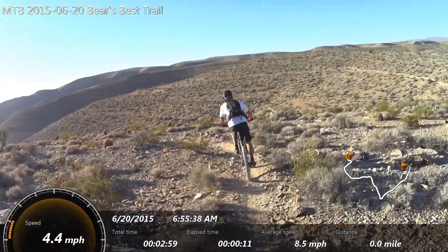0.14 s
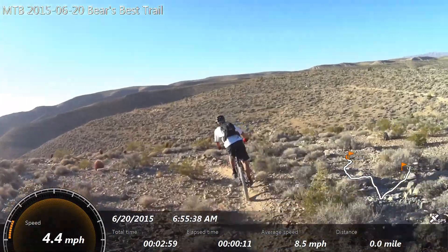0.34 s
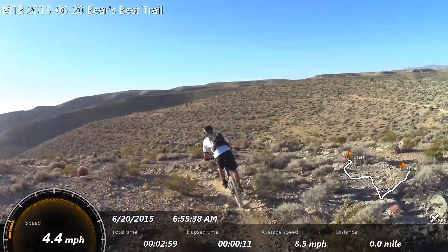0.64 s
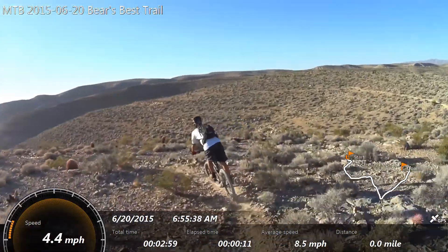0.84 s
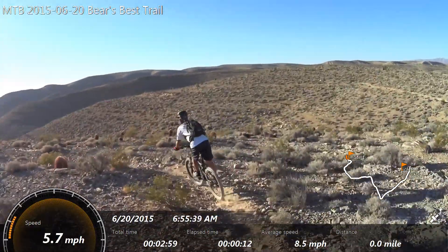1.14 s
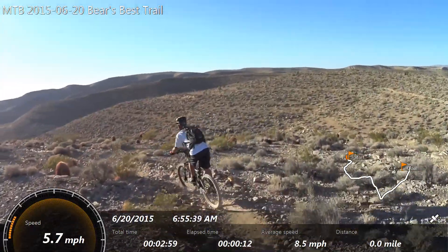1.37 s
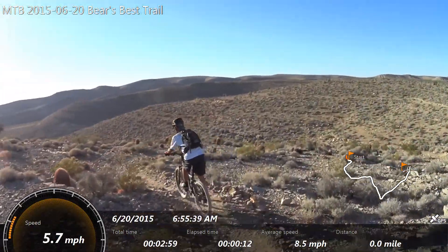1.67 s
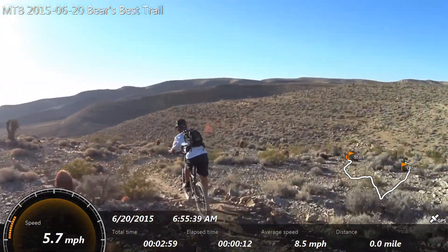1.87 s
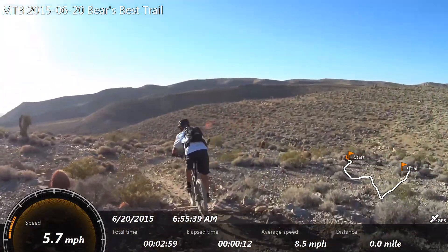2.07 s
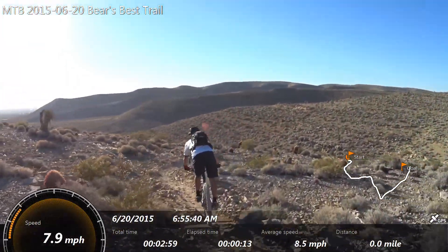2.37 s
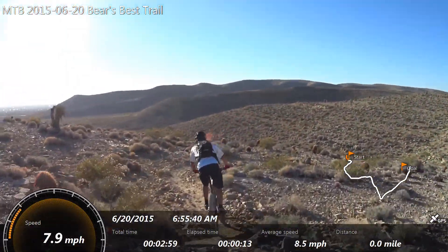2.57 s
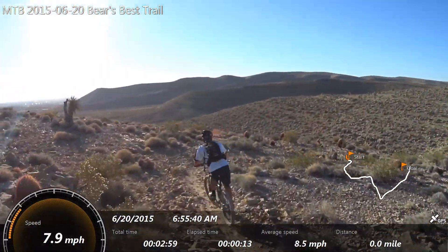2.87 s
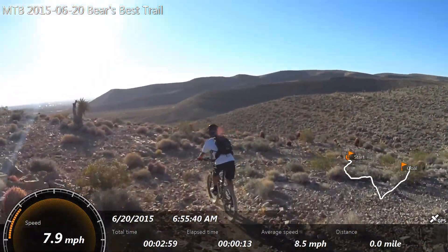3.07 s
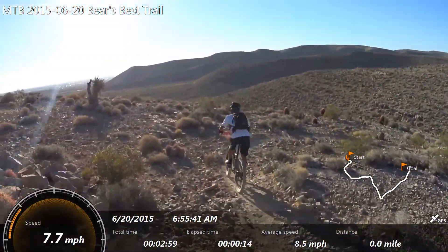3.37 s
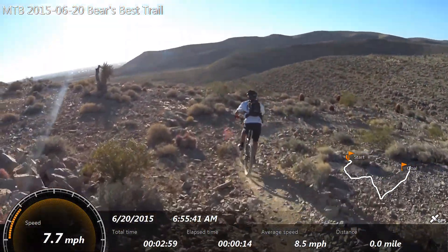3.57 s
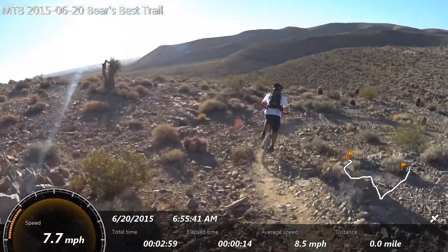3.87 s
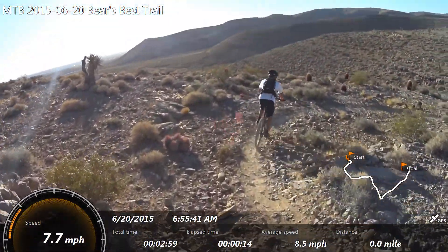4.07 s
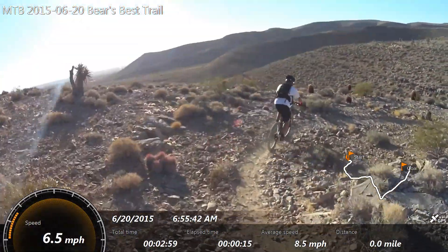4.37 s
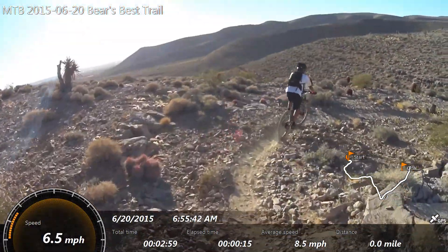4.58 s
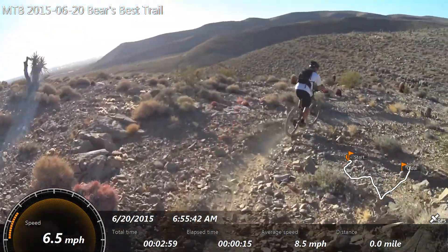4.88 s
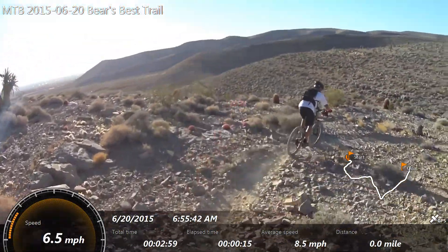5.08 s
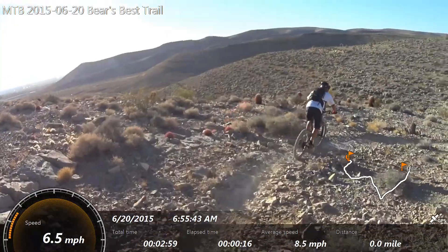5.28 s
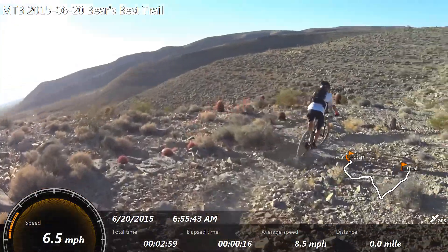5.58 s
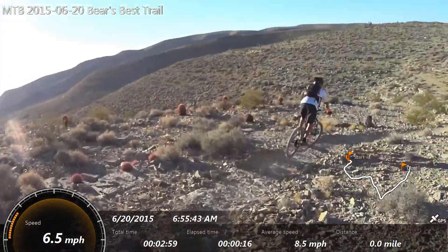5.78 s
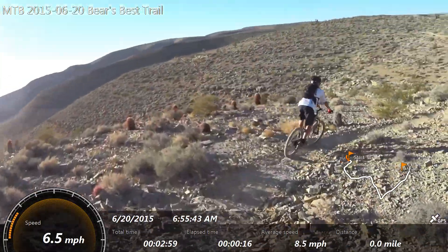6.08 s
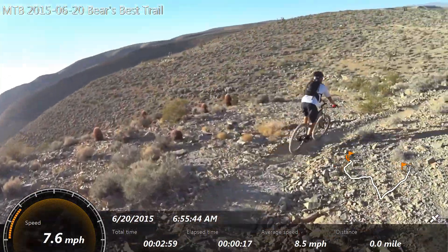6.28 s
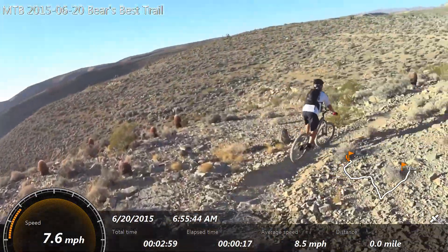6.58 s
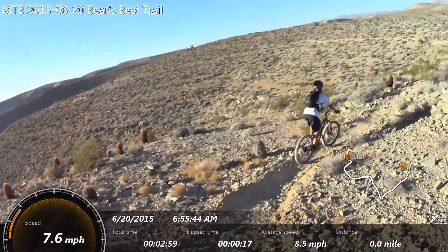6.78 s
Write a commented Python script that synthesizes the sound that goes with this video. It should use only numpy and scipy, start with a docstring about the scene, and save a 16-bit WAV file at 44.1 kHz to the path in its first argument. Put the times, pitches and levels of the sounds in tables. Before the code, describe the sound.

A mountain bike crunches over a gravelly desert trail, rattling and ticking as stones knock it, with a heavy cluster of thumps around two seconds.

```python
"""A rocky desert trail, under a mountain bike, heard from a camera in a plastic case that rides with it.
Tyres crunch gravel and spit grit: clumped random impulses, small resonators and filtered noise.
Rocks knock the bike, flung stones tick and the frame clunks: struck resonances with rattling rebounds.
The chain chinks and a scrape rings a hollow body; crunch, chain and knocks pass the case's resonances.
Hard jolts thump the camera mount as smooth low pulses; air rumbles softly on the ports as low noise."""
import sys
import numpy as np
from scipy import signal
from scipy.fft import rfft, irfft
from scipy.io import wavfile
from scipy.ndimage import uniform_filter1d

SR = 44100
rng = np.random.default_rng(int(sys.argv[2]) if len(sys.argv) > 2 else 0)


def inscribe(sig):
    """Save sig as 16-bit PCM at rate SR to the path in sys.argv[1].

    A 1-D sig is mono; a 2-D sig holds one channel per row.
    Samples are clipped to [-1, 1] before scaling.
    """
    pcm = np.round(np.clip(np.atleast_2d(sig).T, -1, 1) * 32767)
    wavfile.write(sys.argv[1], SR, pcm.astype(np.int16))


N = 305613
T = np.arange(N) / SR

# Trail under the tyres, before loose patches: start_s, crunch_db, grit_db
RIDE = [(0, -49.5, -63), (.3, -50, -63.5), (.6, -46.5, -62.5), (1.2, -47.5, -55), (1.86, -49.5, -61.5),
        (2.25, -44.5, -54.5), (2.92, -45, -49), (3.15, -48, -58.5), (3.55, -51, -52), (3.7, -52.5, -61),
        (4.05, -53, -63), (4.25, -46, -60), (4.66, -43, -56), (4.9, -47.5, -55.5), (5.08, -52, -63),
        (5.36, -47, -57.5), (6.5, -46.5, -54), (6.93, -45.5, -58.5)]
# Patches of loose stones and sand: middle_s, length_s (between half lifts), extra_crunch_db, extra_grit_db
PATCHES = [(.76, 0.11, -1.5, 7.5), (0.897, 0.091, 6.5, 8), (1.061, 0.11, 8.5, 4), (2.084, 0.3, 3, -8),
           (2.478, 0.084, 5, -9), (2.766, 0.093, 8.5, 3.5), (2.917, 0.03, 7.5, 8), (3.395, 0.057, 9, 2.5),
           (3.895, 0.056, 8.5, 5), (4.118, 0.083, 5.5, 4), (4.498, 0.11, 2.5, 0.5), (5.593, 0.19, 2, 8),
           (6.184, 0.087, 4, 4), (6.586, 0.045, 8, 5)]
# Roll of the tyres: level relative to the crunch (dB), further dB per dB of crunch lift in a patch
ROLL_DB, ROLL_IN_PATCH = -19, 0.14
# Air buffeting the ports: start_s, level_db
WIND = [(0, -57), (.25, -62.5), (.52, -54), (1.3, -61.5), (1.8, -62.5), (2.05, -49.5), (2.55, -55),
        (2.9, -64), (3.48, -54), (3.62, -67.5), (4.05, -63), (4.22, -57), (4.75, -55.5), (5.05, -61.5),
        (5.7, -64.5), (5.92, -54), (6.22, -56.5), (6.93, -60)]

# Rocks knocking the bike: start_s, body_level_db, ring_hz, rattle_ms
KNOCKS = [(0.1359, -40, 2220, 2.2), (0.2123, -39.5, 2200, 10), (0.3465, -37, 2640, 5.4),
          (0.7063, -33, 1650, 4.1), (0.9565, -34, 3000, 5), (0.998, -33.5, 2740, 2.2),
          (1.022, -27, 2100, 2.4), (1.962, -31.5, 2760, 6.5), (1.979, -34, 1780, 5.4),
          (2.023, -37.5, 1640, 1.6), (2.068, -33.5, 1630, 14), (2.084, -29, 1640, 7.6),
          (2.1175, -35.5, 2240, 3.5), (2.1548, -27.5, 2140, 2), (2.2956, -25.5, 2000, 3.7),
          (2.328, -32.5, 2770, 1), (2.405, -34, 2900, 3.5), (2.4632, -33.5, 2230, 9),
          (2.4859, -34, 2700, 2.8), (2.7467, -33, 3000, 13), (2.922, -37, 2530, 4), (3.395, -28, 1820, 4.8),
          (3.457, -33, 1600, 2.5), (3.6022, -36, 2930, 1.4), (3.645, -38.5, 3160, 2.5),
          (3.763, -34.5, 2490, 5.6), (3.787, -37, 2220, 4), (3.8434, -22.5, 2050, 5.2),
          (3.882, -30.5, 2400, 0.48), (3.9134, -34, 1970, 4.4), (4.125, -35.5, 1500, 4.7),
          (4.143, -36.5, 1590, 5.5), (4.297, -37, 1730, 15), (4.4623, -31, 2470, 1.2),
          (4.637, -34.5, 1560, 5.8), (4.741, -37.5, 1860, 10), (4.852, -37, 3280, 1.6),
          (5.62, -41, 2240, 3.9), (5.977, -39, 2390, 3), (6.096, -37, 2630, 0.61), (6.428, -31, 1870, 5.6),
          (6.689, -35.5, 2800, 1.8)]
# The stone's own crack: level at a knock of 0 dB (dB), growth (dB per dB of knock)
CRACK_DB, CRACK_GROWTH = -46, 0.1
# Lesser knocks at random: level over the crunch and its spread either way (dB)
LESSER_DB, LESSER_SPREAD_DB = 3, 1
# Their lowest and highest ring (Hz) and rattle length (ms)
LESSER_LOW_HZ, LESSER_HIGH_HZ, LESSER_MS = 1960, 3170, 3.3
# Flung stones ticking on metal: start_s, ping_level_db, ring_hz, rattle_ms
TICKS = [(.19, -55, 5800, 10), (.592, -55.5, 6430, 3.5), (0.705, -44, 4860, 3.5), (.733, -53, 8400, 5.6),
         (.774, -45.5, 7600, 3.4), (0.7823, -41.5, 4800, 3.6), (1.0902, -44, 4700, .6),
         (1.307, -51.5, 7160, 0.26), (2.117, -46, 3900, 2.3), (2.2149, -49.5, 7300, 2.5),
         (2.291, -38.5, 8400, 5), (2.586, -43, 6600, 6), (2.7403, -39, 7840, 2.6), (2.847, -37, 6400, 7.5),
         (2.95, -47, 8700, 4.4), (3.0748, -53, 5500, .3), (3.422, -34.5, 5600, 0.17),
         (3.4567, -35.5, 5200, 1.4), (3.5586, -43.5, 5960, 0.74), (3.589, -43, 5760, 2.8),
         (3.645, -41.5, 4650, 1.9), (3.797, -44, 5400, 2.4), (3.8421, -27.5, 3980, 1.05),
         (4.853, -40.5, 5000, 3), (4.9291, -30, 5250, .4), (4.9302, -29.5, 2960, 1.5),
         (4.94, -41.5, 4840, 1), (5.175, -50, 5370, 4.3), (5.241, -53, 5000, 1.9), (5.6285, -43, 7600, 7.1),
         (6.096, -46, 5200, 0.72)]
# Broad snap of each tick: level at a tick of 0 dB (dB), growth (dB per dB of tick)
SNAP_DB, SNAP_GROWTH = -27.5, 0.45
# Hollow clunks of tyre and frame: start_s, level_db, ring_hz
CLUNKS = [(1.978, -46, 700), (2.084, -46.5, 800), (3.204, -47, 476), (3.393, -66, 378), (3.785, -54.5, 486),
          (3.844, -51.5, 404), (3.912, -53, 460), (4.125, -44, 1130), (4.145, -48.5, 760),
          (4.196, -48, 405), (4.206, -45.5, 303), (4.461, -47.5, 485), (4.486, -45, 370),
          (5.249, -53.5, 890), (6.428, -47, 870)]
# Low thumps, the strong ones jolts of the camera mount and the weak ones at 0.805 and 6.205 s puffs of air:
# middle_s, peak_db, pitch_hz
THUMPS = [(.805, -45, 110), (2.0584, -34.5, 76), (2.077, -35, 80), (2.1008, -26, 96), (2.148, -39, 80),
          (2.189, -36.5, 67), (2.307, -39, 65), (2.323, -38, 74), (6.205, -44.5, 55)]
# Long scrape along the bike: start_s, level_db
SCRAPE = [(.84, -55), (.87, -55), (.94, -47.5), (1.03, -43.5), (1.09, -38), (1.13, -52.5)]
# Hollow resonances of the scrape: centre_hz, bandwidth_hz, relative_db
SCRAPE_MODES = [(530, 32, -14), (838, 44, -7), (1180, 27, -7), (1770, 35, 1), (2100, 56, 3.5),
                (3200, 290, -2.5), (4730, 280, -11)]

# Transmission of the case: frequency_hz, relative_db
CASE = [(100, -30), (400, -21.5), (1000, -13.5), (1380, -11.5), (1660, 4), (2100, -5.5), (2600, -5),
        (3150, 1), (3600, -5), (4000, -3), (4400, -13.5), (5500, -9), (6500, -16), (11000, -47.5)]
# Resonances of the case: centre_hz, half_width_hz, lift_db
CASE_MODES = [(1155, 44, 8), (1898, 86, 7.5), (2322, 122, 10), (2854, 214, 8.5), (4670, 210, 5)]
# Higher resonances of the case under sharp contacts: centre_hz, half_width_hz, lift_db
TICK_MODES = [(2980, 200, -13.5), (3870, 310, 5)]
# Spectrum of sharp stone contact: frequency_hz, relative_db
GRIT = [(500, -36), (1400, -22), (2000, -1), (3500, 5), (5400, 3.5), (6600, -3), (7200, 0), (7600, 0),
        (8200, -1), (11000, -2.5)]
# Spectrum of tyre roll: frequency_hz, relative_db
ROLL = [(60, -14), (180, -1.5), (300, 0.5), (600, 2), (1100, -6.5), (1600, -23.5), (4000, -47)]
# Spectrum of air on the ports: frequency_hz, relative_db
AIR = [(10, -10.5), (28, 6.5), (58, -3.5), (120, -9.5), (200, -16), (400, -29.5), (1500, -86)]
# Spectrum of the still background: frequency_hz, relative_db
HISS = [(60, -18.5), (250, 6), (600, 0), (1300, 1.5), (3000, -37), (6000, -5.5), (11000, -11)]

TOP_HZ = 11100  # upper band edge of the camera
LEAD_S = .02  # time kept ahead of each blow for its scuff
RIGHT_DB = .3  # right channel raised and left lowered by this


def undb(db):
    """Logarithmic level: decibels become an amplitude ratio."""
    return 10 ** (np.asarray(db) / 20)


def unit(x):
    """Normalization: scale to rms 1."""
    return x / np.sqrt(np.mean(x ** 2))


def response(points, modes=(), size=4096):
    """Minimum phase: the folded cepstrum of a spectrum with resonances gives its causal impulse response."""
    hz = np.maximum(np.arange(size // 2 + 1) * SR / size, 1)
    f, level_db = np.transpose(points)
    db = np.interp(np.log(hz), np.log(f), level_db)
    for centre_hz, half_width_hz, lift_db in modes:
        db = db + lift_db / (1 + ((hz - centre_hz) / half_width_hz) ** 2)
    cepstrum = irfft(np.log(undb(db)))
    cepstrum[1:size // 2] *= 2
    cepstrum[size // 2 + 1:] = 0
    return irfft(np.exp(rfft(cepstrum)))[:size // 2]


def through(x, ir):
    """Linear transmission: convolve both channels with an impulse response."""
    return signal.fftconvolve(x, ir[None], axes=1)[:, :x.shape[1]]


def ring(x, hz, q):
    """Simple resonator: one mode with gain 1 at its centre."""
    b, a = signal.iirpeak(min(hz, SR / 3), max(q, .5), fs=SR)
    return signal.lfilter(b, a, x)


def stereo(mid, side):
    """Sum and difference: left and right from mid and side."""
    return np.array([mid + side, mid - side])


def walk(rate):
    """Slow random modulation: independent levels held 1 / rate s and slewed, with spread 1."""
    hold = int(SR / rate)
    steps = np.repeat(rng.standard_normal(N // hold + 1), hold)
    return unit(uniform_filter1d(steps, hold)[:N])


def add(out, s, x):
    """Superposition: mix a short sound in at time s."""
    i = max(int(s * SR), 0)
    out[:, i:i + x.shape[1]] += x[:, :N - i]


def burst(x, db):
    """Energy level: scale a short sound to the rms that it would have if packed into 7 ms."""
    return x * undb(db) / np.sqrt(np.sum(x ** 2) / 2 / (.007 * SR))


def grains(per_s, spread_db, width):
    """Shot noise: random stone contacts, each from its own direction; a positive spread makes a few large."""
    size = undb(spread_db * np.minimum(rng.standard_exponential(N), 5))
    struck = rng.random(N) < per_s / SR
    clicks = struck * size * rng.choice([-1, 1], N)
    return stereo(clicks, clicks * width * rng.standard_normal(N))


def pebbles(low_hz, high_hz, width_hz, per_s, spread_db, count=12):
    """Struck resonators: small stones chink together, every size ringing briefly at its own pitch."""
    out = 0
    for hz in np.geomspace(low_hz, high_hz, count):
        hits = grains(per_s, spread_db, width=.15 + hz / 24000)
        out = out + unit(ring(hits, hz, q=hz / width_hz))
    return unit(out)


def contact(rattle_ms, rattle, tail_db, tail_s, scuff_s, width, size=4096):
    """Repeated impact: a growing scuff, the blow, a quick rattle of rebounds, a shiver of loose parts."""
    t = np.arange(size) / SR - LEAD_S
    chatter = rng.standard_normal((2, size)) * rng.standard_exponential((2, size))
    # rebounds rise three times as fast as they die away
    skewed_ms = np.where(t < 0, 3 * t, t) * 1000
    rebounds = np.exp(-(skewed_ms / max(rattle_ms, .2)) ** 2 / 2)
    shiver = np.exp(np.where(t < 0, t / scuff_s, -t / tail_s))
    envelope = rattle * rebounds / np.linalg.norm(rebounds) + undb(tail_db) * shiver / np.linalg.norm(shiver)
    mid, side = chatter * envelope
    mid[int(LEAD_S * SR)] += 1 / max(rattle_ms, .5)
    # the blow reaches one port just before the other
    lag = .42 * rng.choice([-1, 1]) * np.gradient(mid)
    return stereo(mid, width * side + lag)


def ground():
    """Roughness: the trail sets crunch, grit and roll in dB, and each loose patch swells and fades on top."""
    s, trail_crunch_db, trail_grit_db = np.transpose(RIDE)
    middle, length, more_crunch_db, more_grit_db = np.transpose(PATCHES)
    inside = .5 ** ((2 * (T[:, None] - middle) / length) ** 2)
    stony_db = inside @ more_crunch_db
    crunch_db = np.interp(T, s, trail_crunch_db) + stony_db
    grit_db = np.interp(T, s, trail_grit_db) + inside @ more_grit_db
    roll_db = crunch_db + ROLL_DB + ROLL_IN_PATCH * stony_db
    return crunch_db, grit_db, roll_db


def tyres(case, crunch_db, grit_db, roll_db):
    """Granular contact: gravel crunches in clumps under the tread, sand and chips spray, knobs roll dully."""
    clumps = walk(rate=90)
    gravel = unit(grains(per_s=2400, spread_db=0.4, width=0.35))
    stones = pebbles(low_hz=1612, high_hz=4140, width_hz=320, per_s=40, spread_db=2.0)
    crunch = unit(through((gravel + 0.37 * stones) * undb(2.34 * clumps), case))

    sand = unit(grains(per_s=4000, spread_db=-2.0, width=1.0))
    specks = unit(grains(per_s=110, spread_db=4.2, width=.35))
    chips = pebbles(low_hz=3300, high_hz=10200, width_hz=320, per_s=90, spread_db=2.7)
    spray = (sand + .65 * chips) * undb(1.8 * clumps) + .65 * specks
    grit = unit(through(spray, response(GRIT)))

    knobs = grains(per_s=1400, spread_db=3, width=.55) * undb(2 * clumps)
    roll = unit(through(knobs, response(ROLL)))
    return crunch * undb(crunch_db) + grit * undb(grit_db) + roll * undb(roll_db)


def chain(case, crunch_db):
    """Shaken resonator: the chain chinks in short, soft rings, harder on rougher ground up to a ceiling."""
    shakes = grains(per_s=65, spread_db=3.5, width=0.068)
    chinks = unit(through(ring(shakes, hz=2314, q=18), case))
    return chinks * undb(np.minimum(crunch_db, -48) - 7.5)


def air():
    """Turbulent pressure: low buffeting in puffs, nearly alike on both ports, over a faint wide hiss."""
    mid, side = rng.standard_normal((2, N))
    puffs = undb(3.5 * walk(rate=24))
    buffet = unit(through(stereo(mid, 0.054 * side) * puffs, response(AIR)))
    hiss = unit(through(rng.standard_normal((2, N)), response(HISS)))
    return buffet * undb(np.interp(T, *np.transpose(WIND))) + undb(-62) * hiss


def lesser_knocks(crunch_db, count=28):
    """Random impacts: one small rock per stretch of trail, harder on louder gravel; rows like KNOCKS."""
    when, ring_share, strength = rng.random((count, 3)).T
    s = (np.arange(count) + when) / count * T[-1]
    db = np.interp(s, T, crunch_db) + LESSER_DB + LESSER_SPREAD_DB * (2 * strength - 1)
    ring_hz = LESSER_LOW_HZ + ring_share * (LESSER_HIGH_HZ - LESSER_LOW_HZ)
    return [(at, level, hz, LESSER_MS) for at, level, hz in zip(s, db, ring_hz)]


def knocks(out, case, sharp, crunch_db):
    """Impact excitation: a rock rings the bike through the case, and its own crack hardly grows with force."""
    for s, db, hz, ms in KNOCKS + lesser_knocks(crunch_db):
        blow = contact(ms, rattle=.5, tail_db=-13, tail_s=.018, scuff_s=.005, width=.22)
        body = through(ring(blow, hz, q=4.0) + 0.36 * blow, case)
        crack = through(ring(blow, hz=4700, q=2.4), sharp)
        add(out, s - LEAD_S, burst(body, db) + burst(crack, CRACK_DB + CRACK_GROWTH * db))


def ticks(out, sharp):
    """Short contact: a flung stone pings on metal with a broad snap."""
    for s, db, hz, ms in TICKS:
        blow = contact(ms, rattle=.55, tail_db=-14, tail_s=.008, scuff_s=.0015, width=.22)
        # larger stones ring lower and more purely
        q = (8600 / hz) ** 2
        ping = through(ring(ring(blow, hz, q), hz, q / 2), sharp)
        snap = through(blow, sharp)
        add(out, s - LEAD_S, burst(ping, db) + burst(snap, SNAP_DB + SNAP_GROWTH * db))


def clunks(out):
    """Heavy damping: tyre and frame answer a blow with a hollow, broad resonance."""
    for s, db, hz in CLUNKS:
        blow = contact(rattle_ms=4, rattle=.3, tail_db=-17, tail_s=.012, scuff_s=.003, width=.4)
        add(out, s - LEAD_S, burst(ring(ring(blow, hz, q=1.23), hz, q=0.67), db))


def clatter(case, crunch_db):
    """Superposed impacts: knocks, stone ticks and clunks, each with its own ring."""
    out, sharp = np.zeros((2, N)), response(GRIT, TICK_MODES)
    knocks(out, case, sharp, crunch_db)
    ticks(out, sharp)
    clunks(out)
    return out


def jolts(size=4096):
    """Pressure pulse: each thump gives the case one soft push, with a swing back on either side."""
    out, t = np.zeros((2, N)), (np.arange(size) - size / 2) / SR
    for s, db, hz in THUMPS:
        u = (np.pi * hz * t) ** 2
        push = (2 * u - 1) * np.exp(-u)
        add(out, s + t[0], undb(db) * push * np.ones((2, 1)))
    return out


def scrape():
    """Stick-slip friction: something rubs along the bike in quick, uneven slips that ring a hollow body."""
    slips = grains(per_s=3700, spread_db=4.5, width=0.09)
    body = sum(undb(db) * ring(slips, hz, hz / width) for hz, width, db in SCRAPE_MODES)
    # silent outside the table's span
    return unit(body) * undb(np.interp(T, *np.transpose(SCRAPE), left=-np.inf, right=-np.inf))


def scene():
    """Superposition: the bike's sounds, a little stronger on the right, join the jolts and the air."""
    case = response(CASE, CASE_MODES)
    crunch_db, grit_db, roll_db = ground()
    bike = tyres(case, crunch_db, grit_db, roll_db) + chain(case, crunch_db)
    bike = bike + clatter(case, crunch_db) + scrape()
    return bike * undb([[-RIGHT_DB], [RIGHT_DB]]) + air() + jolts()


def record(dry):
    """Band limiting: the camera cuts the top steeply with an elliptic low-pass."""
    low_pass = signal.ellip(12, .2, 70, TOP_HZ, fs=SR, output="sos")  # order, ripple dB, stopband dB
    return signal.sosfilt(low_pass, dry)


dry = scene()
out = record(dry)
inscribe(out)
```